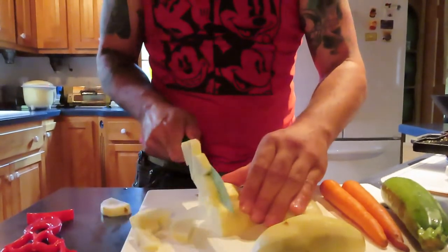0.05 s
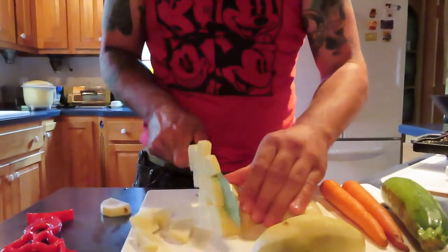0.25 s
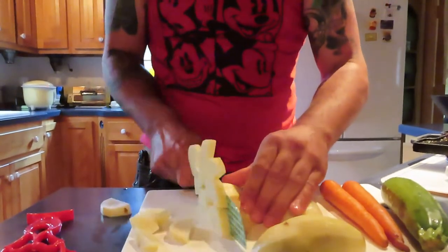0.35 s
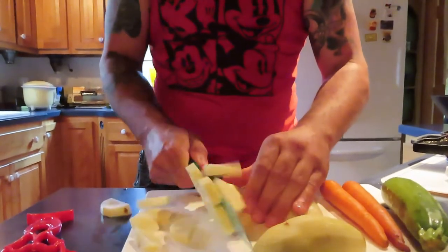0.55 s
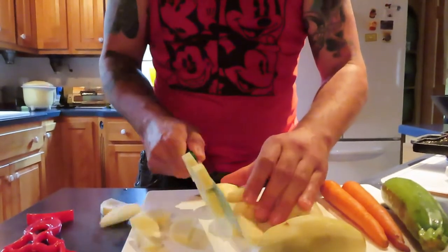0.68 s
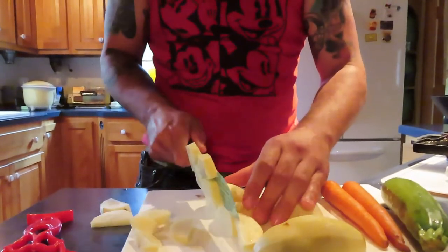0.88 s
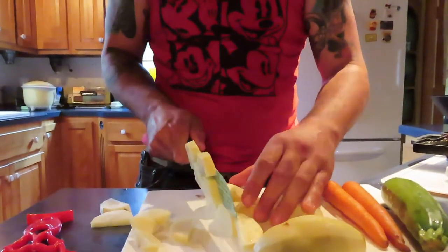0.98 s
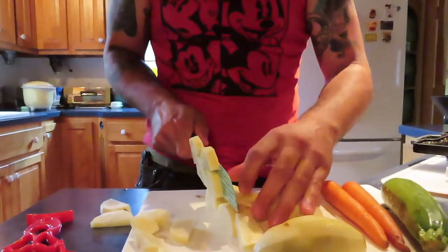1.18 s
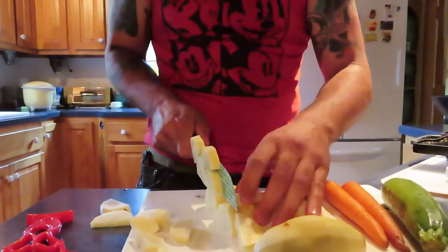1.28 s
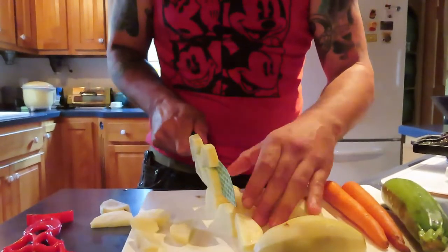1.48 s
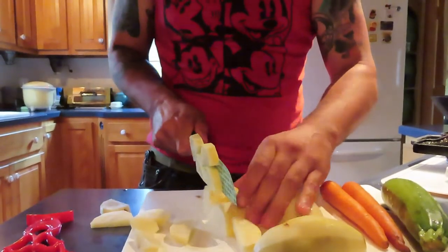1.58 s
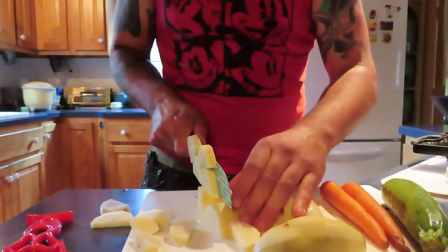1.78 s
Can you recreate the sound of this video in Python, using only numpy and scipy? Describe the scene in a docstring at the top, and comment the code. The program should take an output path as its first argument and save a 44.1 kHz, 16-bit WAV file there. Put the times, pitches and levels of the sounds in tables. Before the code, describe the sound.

One crisp wet potato cut ends in a loud board smack, then soft thuds and light taps

```python
"""Over quiet room rumble and hiss, a last bit of scraping and a soft bump lead into a knife cut.
The blade sinks through a raw potato with a growing wet hiss: random bursts of tiny pops, coloured.
It smacks the board (a noise crack and short ringing tones), overloading a close microphone.
The slice tears free and tumbles off; wet slides, thuds, light taps and small clicks follow.
Late on, the blade scrapes into the next cut. A small kitchen echoes and rings behind it all."""
import sys
import numpy as np
from scipy import signal
from scipy.fft import rfft, irfft, next_fast_len
from scipy.io import wavfile

SR = 44100
rng = np.random.default_rng(int(sys.argv[2]) if len(sys.argv) > 2 else 0)


def wav_record(signal):
    """Record a signal, one row per channel, as 16-bit PCM in the file named by sys.argv[1]."""
    frames = np.transpose(np.atleast_2d(signal))
    bounded = np.clip(frames, -1, 1)
    # unit amplitude maps onto the largest positive 16-bit level
    quanta = np.round(bounded * 32767).astype(np.int16)
    wavfile.write(sys.argv[1], SR, quanta)


N = 81585  # length in samples

ENTER_S, CHOP_S = 0.2116, 0.2848  # blade enters the potato, blade reaches the board


def amp(db):
    """Turn decibels into a gain."""
    return 10 ** (np.asarray(db) / 20)


def unit(x):
    """Scale a sound to an average (rms) strength of 1."""
    return x / np.sqrt(np.mean(x ** 2) + 1e-20)


def along(points, hz):
    """Read a curve of (Hz, value) points at any frequency, on a log axis."""
    f, v = np.transpose(points)
    return np.interp(np.log(hz + 1), np.log(f + 1), v)


def since(s):
    """Seconds passed since time s at every sample, zero before it."""
    return np.maximum(np.arange(N) / SR - s, 0)


def filtered(x, response):
    """Multiply each frequency of x by response(hz)."""
    m = next_fast_len(N + SR // 2)  # spare room at the end, so echoes do not wrap round
    return irfft(rfft(x, m) * response(np.fft.rfftfreq(m, 1 / SR)), m)[..., :N]


def ring(s, hz, t60, attack):
    """One tone struck at s: it builds over attack seconds and falls 60 dB in t60 seconds."""
    t = since(s)
    decay = np.exp(-np.log(1000) * t / t60)
    return np.sin(2 * np.pi * hz * t) * decay * (1 - np.exp(-t / attack))


def grains(spectrum, rate):
    """Tiny ruptures at random moments, about rate a second, coloured and scaled to rms 1."""
    pops = (rng.random(N) < rate / SR) * rng.standard_normal(N)
    return unit(filtered(pops, lambda hz: amp(along(spectrum, hz))))


def stroke(s, length, slope_db, edge):
    """Strength of a rub with soft edges; its level changes by slope_db, passing 0 dB halfway."""
    t = since(s)
    progress = np.minimum(t / length, 1)
    fade_in = 1 - np.exp(-t / edge)
    fade_out = np.exp(-since(s + length) / edge)
    return fade_in * amp(slope_db * (progress - 0.5)) * fade_out


def swells(rows):
    """Smooth bell-shaped rises and falls of strength, one for each (peak_s, level_db, width_s)."""
    return sum(amp(db) * np.exp(-0.5 * ((since(0) - s) / width) ** 2) for s, db, width in rows)


def room_air():
    """Steady room rumble and hiss: noise whose left-right likeness depends on frequency."""
    # colour of the room noise: pitch_hz [Hz], level_db [dB]
    air_colour = [(15, -60), (25, -21.5), (93, -6), (129, -10), (164, -1.5), (253, -14.5), (289, -5),
                  (410, -14.5), (495, -14), (684, -17), (2010, -25.5), (2770, -27.5), (3260, -29.5),
                  (11500, -41.5), (15500, -46.5)]
    # left-right likeness, 1 = same and 0 = unrelated: pitch_hz [Hz], likeness [no unit]
    likeness = [(60, 0.9), (180, 0.87), (550, 0.04), (1650, 0.097), (4970, 0.49), (15000, -0.01)]

    def response(hz):
        # the angle shares the noise between the middle and the sides
        angle = np.arccos(np.clip(along(likeness, hz), -1, 1)) / 2
        return amp(along(air_colour, hz)) * [np.cos(angle), np.sin(angle)]

    mid, side = filtered(rng.standard_normal((2, N)), response)
    return amp(-47) * unit(np.array([mid + side, mid - side]))  # overall level -47 dB


def scrape_skin():
    """The blade rubs the potato skin: dense tiny ruptures, fading during each scrape."""
    # scrapes: start_s [s], length_s [s], level_db halfway [dB], fade_db over the length [dB]
    scrapes = [(-.02, 0.065, -38, 10.5), (1.4726, 0.042, -39.5, 4.5)]
    # colour of scraped skin: pitch_hz [Hz], level_db [dB]
    skin = [(100, -20), (300, 1), (450, 0.5), (700, 5), (950, -7), (1500, -3), (2200, -11.5), (3100, -19.5),
            (4500, -30), (14000, -55.5)]
    strength = sum(amp(db) * stroke(s, length, -fade_db, edge=0.0015)
                   for s, length, db, fade_db in scrapes)
    return strength * grains(skin, rate=3000)


def kitchen(x):
    """Near surfaces echo; then a diffuse tail dies, each frequency at its own speed."""
    # near surfaces: delay_s [s], level_db before dulling [dB]
    near_surfaces = [(.0068, -17.5), (.009, -18.5), (0.015, -23.5)]
    # time for the tail to fall 60 dB: pitch_hz [Hz], t60_s [s]
    tail_t60 = [(100, 0.6), (400, .33), (700, 0.41), (1700, 0.48), (4000, 0.47), (12000, 0.175)]
    # colour of the tail: pitch_hz [Hz], level_db [dB]
    tail_colour = [(80, 0), (300, -1), (700, 0.5), (1100, 2.5), (1600, -3), (2300, -1), (3400, -3.5),
                   (12000, -14)]
    # side of the tail against its middle: pitch_hz [Hz], level_db [dB]
    tail_side = [(80, -54.5), (400, -13), (1500, -21.5), (4000, -0.5), (10000, 10.5)]
    wall_dull_hz, room_build_s, room_db = 3490, 0.0027, -6.5

    def echoes(hz):
        delayed = sum(amp(db) * np.exp(-2j * np.pi * hz * s) for s, db in near_surfaces)
        return delayed / (1 + 1j * hz / wall_dull_hz)  # gentle loss of treble

    early = filtered(x, echoes)
    # shape one second of noise by frequency and time to get the tail
    hz, t, z = signal.stft(rng.standard_normal((2, SR)), SR, nperseg=256)
    decay_db = -60 * t / along(tail_t60, hz)[:, None]
    z = z * amp(decay_db + along(tail_colour, hz)[:, None])
    z = z * (1 - np.exp(-t / room_build_s))
    tail = signal.istft(z, SR, nperseg=256)[1] / np.sqrt(SR / 30)
    mid, side = amp(room_db) * signal.fftconvolve(x[None], tail, axes=1)[:, :N]
    side = filtered(side, lambda hz: amp(along(tail_side, hz)))
    return early + np.array([mid + side, mid - side])


def bump_board():
    """Soft thuds as hands and pieces bump the board: three low, dying tones each."""
    # thuds: start_s [s], level_db before the mode level [dB], pitch_hz [Hz], t60_s before the share [s]
    thuds = [(0.129, -33.5, 88.5, 0.057), (0.212, -21, 108, 0.13), (.213, -22.5, 296, 0.024),
             (.352, -20, 128.3, 0.09), (0.413, -30.5, 173, 0.14), (.435, -24.5, 264, 0.066),
             (.527, -25.5, 187, 0.042), (0.541, -24.5, 252, 0.061), (0.557, -28.5, 106, 0.11),
             (.603, -28.5, 210, 0.057), (.622, -32, 109.5, 0.23), (.645, -33, 147.4, 0.045),
             (0.656, -27, 111.5, 0.068), (.681, -29, 242, 0.036), (.70, -32.5, 112, 0.25),
             (0.727, -30, 185, .05), (0.76, -34.5, 96, 0.11), (1.305, -39, 110, 0.1),
             (1.512, -28.5, 348, 0.038), (1.658, -34, 184, 0.031), (1.68, -32.5, 178, 0.046)]
    # tones in each thud: ratio to the pitch [no unit], level_db [dB], share of the t60 [no unit]
    thud_modes = [(1, 1.5, 0.78), (2.4, -4, 0.38), (4.3, -20, 0.363)]
    return sum(amp(db + level) * ring(s, hz * ratio, t60 * share, attack=0.00086)
               for s, db, hz, t60 in thuds for ratio, level, share in thud_modes)


def cut_flesh():
    """Potato cells burst in a dense hiss that grows louder as the blade sinks to the board."""
    # colour of the bursting flesh: pitch_hz [Hz], level_db [dB]
    flesh = [(60, -20.5), (150, 16.5), (400, 12), (900, 3.5), (1700, 0), (2600, -4), (4500, -14.5),
             (8500, -14), (13000, -15.5), (16000, -31)]
    halfway_db, grows_db = -34.5, 9
    strength = stroke(ENTER_S, CHOP_S - ENTER_S, grows_db, edge=0.0013)
    return amp(halfway_db) * strength * grains(flesh, rate=17000)


def slide_wet():
    """Wet flesh slides along the blade: short swells of tiny ruptures."""
    # slides: peak_s [s], level_db [dB], half_length_s [s]
    slides = [(.345, -57, 0.046), (.41, -45, 0.0064), (.458, -44.5, 0.014), (.545, -54.5, .011),
              (.735, -66, 0.0049), (.76, -59, .006), (.94, -57, 0.0069), (1.585, -57.5, 0.043),
              (1.615, -49.5, 0.0082), (1.67, -64, 0.025)]
    # colour of wet sliding: pitch_hz [Hz], level_db [dB]
    wet = [(200, -11), (700, 3.5), (1800, 6.5), (3500, 2.5), (6000, -4.5), (10000, -6), (15000, -13)]
    return swells(slides) * grains(wet, rate=3500)


def smack_board():
    """The edge smacks the board: a dying noise crack and the short tones of the board."""
    # board under the blade: pitch_hz [Hz], level_db before the lift [dB], t60_s [s]
    board = [(108, -34.5, 0.21), (166, -26.5, 0.026), (257, -12, 0.022), (478, -14.5, 0.014),
             (660, -16, .03), (905, -24, 0.029), (1156, -10.5, 0.018), (1617, 1, 0.011), (1787, 0.5, 0.01),
             (2087, -13, 0.018), (2612, -14, 0.0088), (2940, -16, 0.0076)]
    # colour of the crack: pitch_hz [Hz], level_db [dB]
    crack_colour = [(100, -25), (300, -3.5), (650, 1), (1700, 0.5), (2800, 1), (5000, -14), (9000, -18),
                    (16000, -29)]
    lift_db = 9.5  # raises the crack and the tones alike
    crack_before_lift_db, crack_t60_s = -21, 0.017
    t = since(CHOP_S)
    crack_strength = amp(crack_before_lift_db - 60 * t / crack_t60_s) * (t > 0)
    crack = crack_strength * grains(crack_colour, rate=25000)
    tones = sum(amp(db) * ring(CHOP_S, hz, t60, attack=0.00097) for hz, db, t60 in board)
    return amp(lift_db) * (crack + tones)


def tear_slice():
    """The slice tears free: swells of tiny ruptures with little high treble."""
    # tears: peak_s [s], level_db [dB], half_length_s [s]
    tears = [(.354, -24.5, 0.018), (.455, -31.5, 0.0049)]
    # colour of torn flesh: pitch_hz [Hz], level_db [dB]
    torn = [(150, 0), (400, -1.5), (900, -4), (1600, 0), (2200, -1.5), (3000, -18.5), (5000, -32.5),
            (12000, -61)]
    return swells(tears) * grains(torn, rate=3000)


def tap_pieces():
    """Light taps of blade and potato: each rings a set of tones above one pitch."""
    # taps: start_s [s], level_db before mode level and tilt [dB], pitch_hz [Hz], tilt [dB per octave]
    taps = [(.5415, -28, 475, -17), (.6455, -29.5, 553, -10.5), (.713, -45, 557, -11),
            (.7572, -19, 632.6, 0)]
    # tones in each tap: ratio to the pitch [no unit], level_db [dB], t60_s [s]
    tap_modes = [(1, 4, 0.017), (1.26, -8.5, 0.047), (1.63, -11, .035), (2.45, 1, 0.013), (3.4, -20, 0.037),
                 (4.45, -6, 0.0081), (8.5, -28, 0.0072)]
    sound = np.zeros(N)
    for s, db, hz, tilt in taps:
        for ratio, level, t60 in tap_modes:
            tone_db = db + level + tilt * np.log2(ratio)  # the tilt sets how bright the tap is
            sound += amp(tone_db) * ring(s, hz * ratio, t60, attack=0.0006)
    return sound


def click_pieces():
    """Small clicks as the pieces and the knife are moved: one short high tone each."""
    # clicks: start_s [s], level_db [dB], pitch_hz [Hz]
    clicks = [(0.9381, -35, 2790), (1.208, -44, 3850)]
    return sum(amp(db) * ring(s, hz, 0.012, attack=0.00046) for s, db, hz in clicks)


def scene():
    """Knife work straight ahead, with the kitchen and its air around it."""
    cutting = scrape_skin() + cut_flesh() + slide_wet() + tear_slice()
    knocks = bump_board() + smack_board() + tap_pieces() + click_pieces()
    work = cutting + knocks
    return work + kitchen(work) + room_air()


def record(dry):
    """A bass cut; gain control ducks too late for the smack, which clips; then a treble limit."""
    low_cut_hz, top_hz = 44.4, 15800
    limit_db, duck_smoothing_s, recover_db_per_s = -0.5, 0.012, 163
    low_cut = signal.butter(2, low_cut_hz, "high", fs=SR, output="sos")
    dry = signal.sosfilt(low_cut, dry)
    loudest_side = np.abs(dry).max(0)
    over_db = np.maximum(20 * np.log10(loudest_side + 1e-9) - limit_db, 0)
    # hold each peak, letting it fall at a steady speed
    recovery_db = recover_db_per_s * since(0)
    held_db = np.maximum.accumulate(over_db + recovery_db) - recovery_db
    # smoothing makes the duck arrive late
    pole = np.exp(-1 / (duck_smoothing_s * SR))
    duck_db = signal.lfilter([1 - pole], [1, -pole], held_db)
    clipped = np.clip(dry * amp(-duck_db), -1, 1)
    return filtered(clipped, lambda hz: hz < top_hz)


dry = scene()
out = record(dry)
wav_record(out)
```